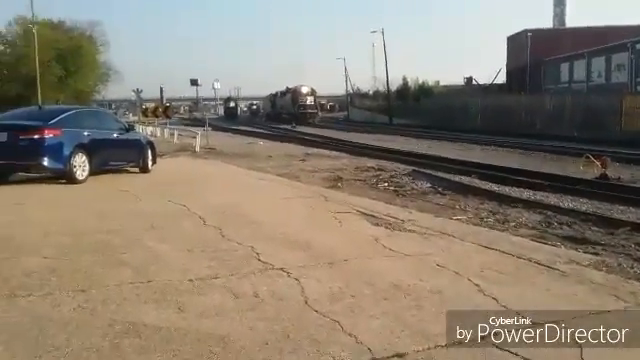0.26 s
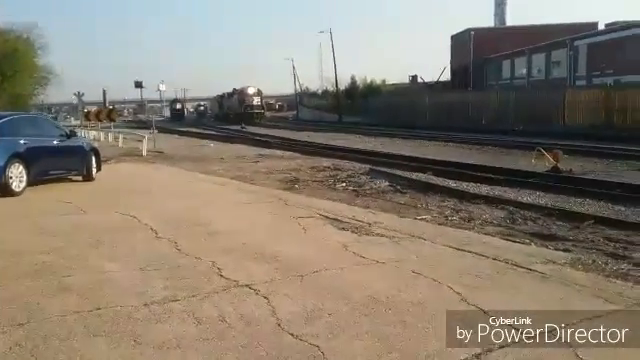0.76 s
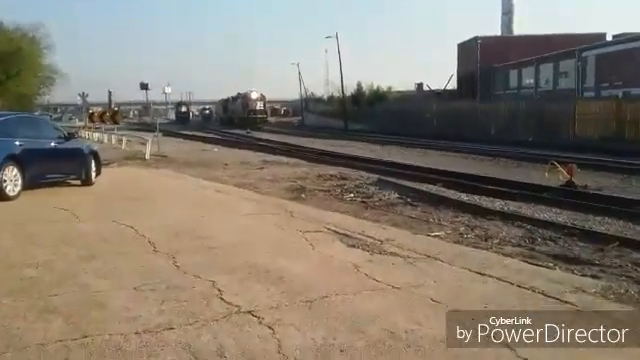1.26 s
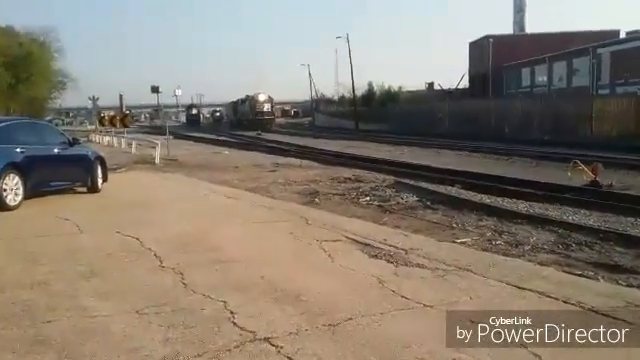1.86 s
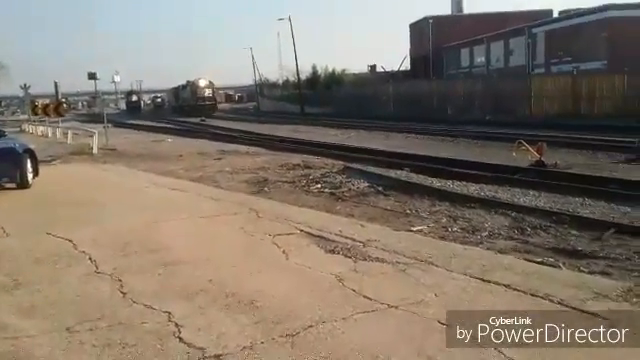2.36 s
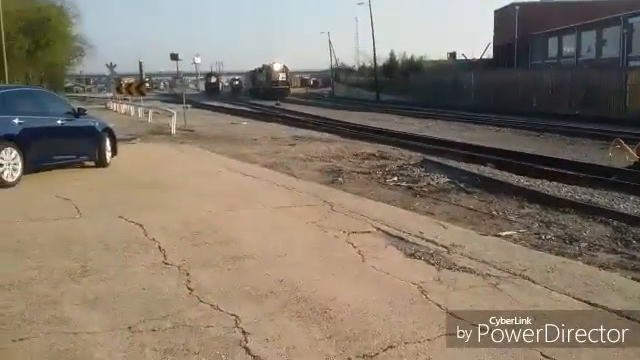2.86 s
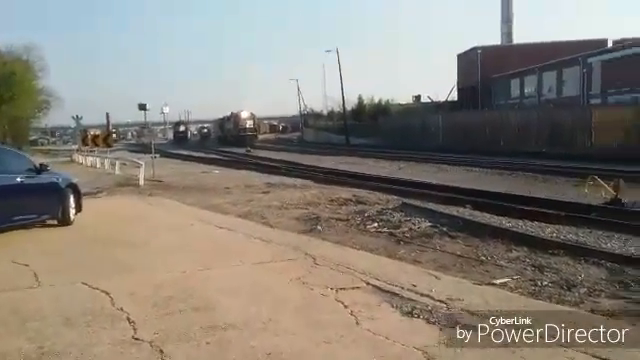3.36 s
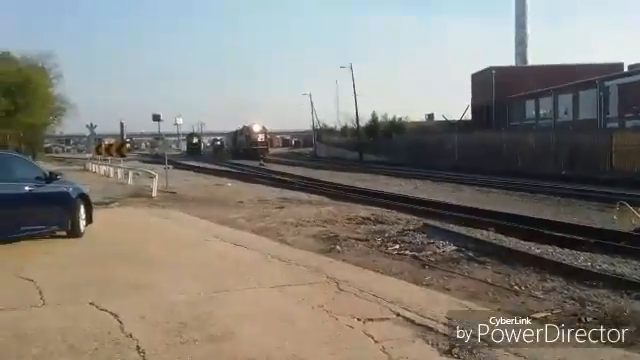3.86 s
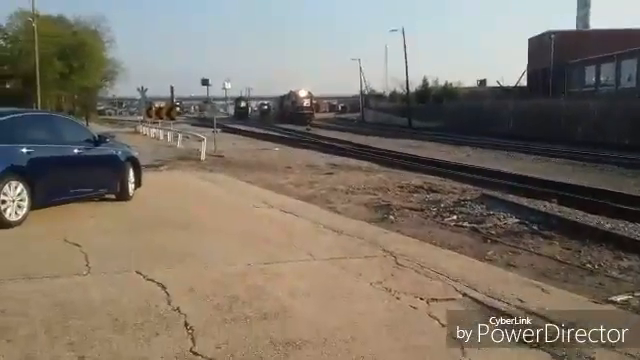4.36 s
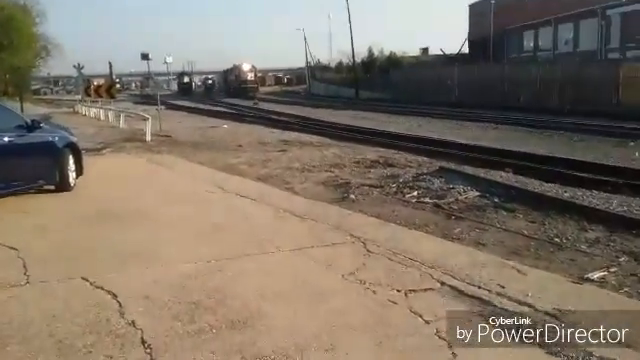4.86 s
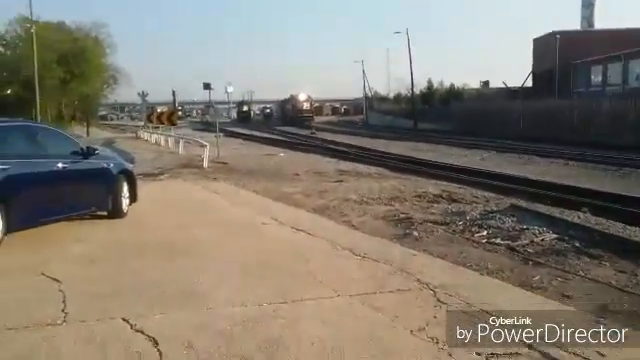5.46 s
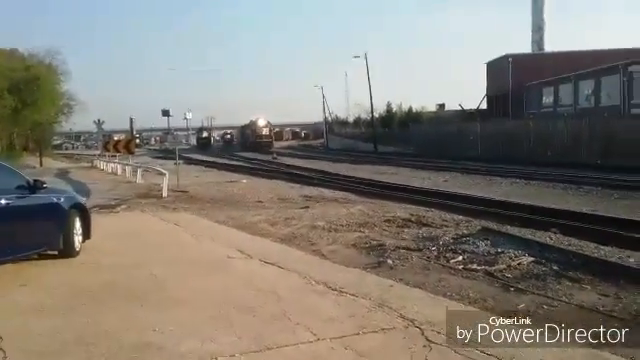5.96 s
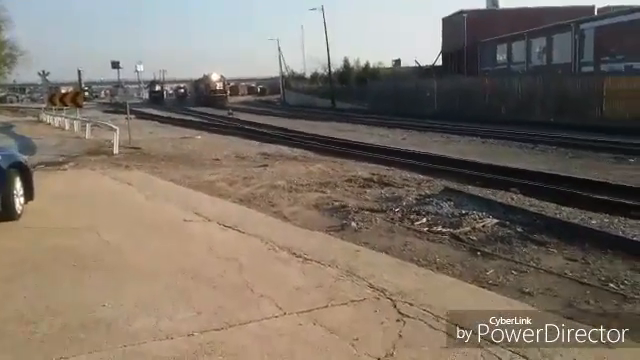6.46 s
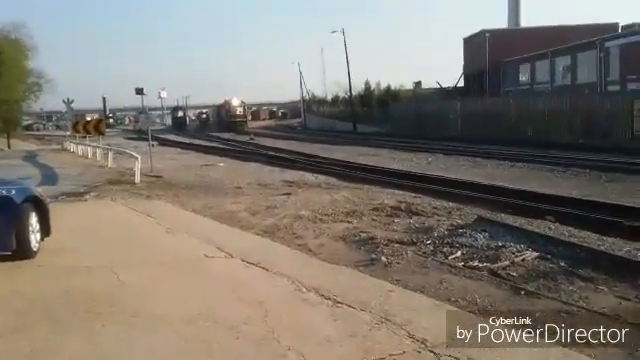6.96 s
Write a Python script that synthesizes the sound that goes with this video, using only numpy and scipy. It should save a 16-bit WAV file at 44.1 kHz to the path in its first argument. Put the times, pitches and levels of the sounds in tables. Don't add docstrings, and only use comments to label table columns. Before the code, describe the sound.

Two diesel locomotives idle across an open rail yard, their low throbbing drone slowly beating under faint whine and hiss while wind thumps the microphone.

```python
import sys
import numpy as np
from scipy import signal
from scipy.fft import rfft, irfft, next_fast_len
from scipy.io import wavfile

SR = 44100
rng = np.random.default_rng(int(sys.argv[2]) if len(sys.argv) > 2 else 0)


def dump_mix(stems):
    frames = np.atleast_2d(stems).T
    limited = np.clip(frames, -1, 1)
    pcm = np.round(limited * 32767).astype(np.int16)
    wavfile.write(sys.argv[1], SR, pcm)


def elevation(decibels):
    levels = np.asarray(decibels, float)
    return 10 ** (levels / 20)


N = 318402


def seconds():
    return np.arange(N) / SR


def curve(rows):
    s, db = np.transpose(rows)
    return np.interp(seconds(), s, db)


def swelling(rows):
    t = seconds()
    return sum(db * np.exp(-((t - s) / length) ** 2) for s, db, length in rows)


def rms_one(x):
    return x / np.sqrt(np.mean(x ** 2) + 1e-20)


def drift(rate):
    r = np.exp(-80 * np.pi * rate / SR)
    slow = signal.lfilter([1], [1, -2 * r, r * r], rng.standard_normal(N // 40 + 2002))[2000:]
    return np.interp(np.arange(N) / 40, np.arange(len(slow)), rms_one(slow - slow.mean()))


def resonance(x, hz, width):
    r = np.exp(-np.pi * width / SR)
    top_gain_one = np.array([1, 0, -1]) * (1 - r * r) / 2
    return signal.lfilter(top_gain_one, [1, -2 * r * np.cos(2 * np.pi * hz / SR), r * r], x)


def ringing_noise(hz, width):
    once = resonance(rng.standard_normal(N), hz, width)
    return rms_one(resonance(once, hz, width))


def noise(spectrum, shared_db, own_db, rate):
    size = next_fast_len(N)
    octave = np.log2(np.arange(1, size // 2 + 2) * SR / size)
    hz, db = np.transpose(spectrum)
    colour_db = np.interp(octave, np.log2(hz), db, left=-150, right=-150)
    colour = rfft(rng.standard_normal(size)) * elevation(colour_db)
    together_db = shared_db * drift(rate)
    out = 0
    for centre in np.arange(np.log2(hz[0]), np.log2(hz[-1]) + .5, .5):
        overlap = np.clip(1 - 2 * abs(octave - centre), 0, 1)
        band = irfft(colour * overlap, size)[:N]
        out = out + band * elevation(together_db + own_db * drift(rate))
    return rms_one(out)


def whine(hz, width, flicker_db=3.9):
    phase = 2 * np.pi * np.cumsum(hz + 0.608 * width * drift(width)) / SR
    return np.sqrt(2) * elevation(flicker_db * drift(34)) * np.sin(phase)


def tones(pitches_hz, shapes):
    return sum(elevation(db + 1.5 * drift(1.8)) * whine(hz, width)
               for hz, (width, db) in zip(pitches_hz, shapes))


def order_tone(turns, db):
    return np.sqrt(2) * elevation(db) * np.cos(2 * np.pi * turns)


# time in seconds, level in dB.
THROB = [(0, -27), (.55, -28), (.95, -20.5), (2.2, -24), (2.8, -21), (4.2, -23), (5, -28.5), (6.3, -20),
         (7.22, -22.5)]
# order of the engine cycle, near engine in dB, far engine in dB.
EXHAUST_ORDERS = [(7, -59, -43), (10, -34, -40), (11, -30, -30.5), (13, -41.5, -47), (14, -46, -44.5),
                  (15, -37.5, -40), (16, -41, -53.5), (18, -42.5, -44), (20, -32.5, -44.5),
                  (21, -36.5, -59.5), (22, -30, -41.5), (24, -31.5, -43), (26, -48.5, -51.5)]
NEAR_CYCLE_HZ, FAR_CYCLE_HZ = 8.393, 8.353
NEAR_THROB_S, FAR_THROB_S = .071, .0405
NEAR_DB, NEAR_SAG_S, NEAR_SAG_DB_PER_S = -20.2, 6.0, 3.5
FAR_DB, FAR_FADE_S, FAR_FADE_DB_PER_S = -20.6, 3.8, 9.5


def engines():
    t = seconds()
    near = NEAR_CYCLE_HZ * (t - NEAR_THROB_S)
    far = FAR_CYCLE_HZ * (t - FAR_THROB_S)
    near_sag_db = -NEAR_SAG_DB_PER_S * np.maximum(t - NEAR_SAG_S, 0)
    far_fade_db = -FAR_FADE_DB_PER_S * np.maximum(t - FAR_FADE_S, 0)
    out = order_tone(8 * near, NEAR_DB + near_sag_db)
    out += order_tone(8 * far, FAR_DB + far_fade_db)
    out += order_tone(9 * near, curve(THROB))
    for order, near_db, far_db in EXHAUST_ORDERS:
        for turns, db in ((near, near_db), (far, far_db + far_fade_db)):
            wander_db = 1.6 * drift(1.5)
            out += order_tone(round(order) * turns + .25 * rng.random(), db + wander_db)
    return out


# frequency in Hz, density in dB per Hz.
ROAR_COLOUR = [(18, -42.5), (30, -13), (82, -2), (125, -11), (194, -8.5), (360, -26), (595, -25.5),
               (667, -23.5), (749, -26.5), (1310, -30), (3000, -52), (3900, -84.5), (6600, -120)]


def roar(carry_db):
    sink_db = 0.25 * (seconds() - 4.5)
    level = elevation(-27.5 + 0.12 * carry_db - sink_db)
    return level * noise(ROAR_COLOUR, shared_db=1.3, own_db=1.06, rate=6.4)


# frequency in Hz, density in dB per Hz.
CLATTER_COLOUR = [(820, -7.5), (1400, -3), (2210, -3), (2360, -1), (2640, -7), (3850, -12), (4590, -13.5),
                  (6000, -16.5), (7800, -49.5), (13200, -120)]


def clatter(carry_db):
    return elevation(-41 + 0.88 * carry_db) * noise(CLATTER_COLOUR, shared_db=0.72, own_db=1.0, rate=3.8)


GEAR_HZ = [663.2, 948.8, 1326, 1338, 1519.5, 1989.6, 2368.6, 11633, 11768]
# width in Hz, level in dB.
GEAR_SHAPES = [(4.1, -48.5), (3.7, -57), (2.87, -49.5), (2.7, -56.5), (3.5, -71.5), (9, -56), (3.8, -54.5),
               (5, -92), (8, -92)]


def gears(carry_db):
    return elevation(1 + .3 * carry_db) * tones(GEAR_HZ, GEAR_SHAPES)


BLOWER_HZ = [4515, 4587, 4656, 4724]
# width in Hz, level in dB.
BLOWER_SHAPES = [(29, -10.5), (21.9, -5.5), (16, -3), (29.3, -5)]
# middle in seconds, rise in dB, length in seconds.
BLOWER_SWELLS = [
    (.62, 5, 0.31),
    (1.37, 4.5, 0.096),
    (2.76, 4, .08),
    (5.4, 5, 0.17),
    (6.15, 4, .15),
]


def blower(carry_db):
    level_db = -56.5 + 0.96 * carry_db + swelling(BLOWER_SWELLS) + 1.5 * drift(5.8)
    return elevation(level_db) * tones(BLOWER_HZ, BLOWER_SHAPES)


# frequency in Hz, density in dB per Hz.
HISS_COLOUR = [(2940, -45), (5000, -18), (6090, -10.5), (6580, -5), (6870, -2), (7120, 5.5), (7380, -12.5),
               (7700, -23), (8560, -29), (11100, -61), (18800, -120)]
# middle in seconds, rise in dB, length in seconds.
HISS_SWELLS = [(0.116, 0, .08), (.45, 3.5, 0.12), (1.175, 2.5, 0.054), (1.45, -1, .05), (2.633, 6.5, 0.13),
               (2.97, 4, .05), (4.868, 8, 0.047), (5.313, 0.5, 0.039), (5.553, 5.5, 0.062),
               (5.978, 2.5, .05)]


def hiss(carry_db):
    steady = noise(HISS_COLOUR, shared_db=.1, own_db=.6, rate=59)
    peak_db = swelling(HISS_SWELLS) + 2 * drift(40)
    port = resonance(steady, 7050, width=1800)
    return elevation(-42.5 + 0.96 * carry_db) * (steady + (elevation(peak_db) - 1) * port)


SQUEAL_HZ = [3343, 4116.5, 5630, 5900, 7700, 8209, 8282, 8700]
# width in Hz, level in dB, time to fall 60 dB in seconds.
SQUEAL_SHAPES = [(6, -47.5, .7), (5, -50.5, .9), (12, -56, .5), (12, -54, .5), (30, -64, .7), (8, -66, .9),
                 (8, -69, .8), (10, -74, .7)]


def squeal():
    t = seconds()
    past_hold = np.maximum(t - .2, 0)
    out = elevation(-58 - 60 * t / 1.4) * ringing_noise(10000, 5500)
    for hz, (width, db, t60) in zip(SQUEAL_HZ, SQUEAL_SHAPES):
        out += elevation(db + 1 - 60 * past_hold / t60) * whine(hz, width, flicker_db=.8)
    return out


# top in seconds, level in dB.
SPURTS = [
    (2.95, -37.5),
    (3.08, -39),
    (3.221, -30),
]
# frequency in Hz, density in dB per Hz.
PUFF_COLOUR = [(260, -45), (450, -9), (560, -5), (830, -6.5), (869, -8.5), (1480, -3), (2850, -18.5),
               (3180, -21), (4000, -27), (5200, -56), (8800, -120)]


def puff():
    t = seconds()
    level = 0
    for s, db in SPURTS:
        rise_db = 66.5 * np.maximum(s - t, 0)
        fall_db = 60 * np.maximum(t - s, 0)
        level = level + elevation(db - rise_db - fall_db)
    return level * noise(PUFF_COLOUR, shared_db=.3, own_db=.8, rate=19)


# time in seconds, level in dB.
GUST = [(0, -35), (.5, -36), (.8, -35.5), (1.07, -29), (1.4, -29.5), (1.7, -33.5), (1.95, -31.5),
        (2.3, -39), (2.9, -39), (3.5, -32), (3.9, -38.5), (4.2, -32.5), (4.5, -37.5), (4.9, -34),
        (5.4, -33.5), (5.7, -38), (6.8, -40), (7.22, -38)]
# middle in seconds, peak in dB, pitch in Hz.
EDDIES = [(.44, -9, 400), (.472, -13.5, 300), (.505, -6, 510), (.524, -9.5, 370), (0.803, -11, 288),
          (.975, -6, 514), (1.07, -5, 420), (1.24, -8, 400), (1.371, -9.5, 870), (1.401, -8.5, 820),
          (1.44, -6, 400), (1.5, -7.5, 268), (1.524, -11.5, 607), (1.621, -6.5, 372), (1.892, -5.5, 400),
          (1.975, -13.5, 590), (2.103, -12, 259), (2.544, -10.5, 320), (3.215, -11, 280),
          (3.48, -12.5, 400), (3.564, -10.5, 510), (3.658, -12, 370), (3.893, -11.5, 302),
          (4.204, -10.5, 510), (4.364, -11, 480), (4.743, -8.5, 417), (5.09, -9, 424), (5.648, -15.5, 480),
          (6.632, -16.5, 300), (7.17, -14.5, 370)]


def eddies():
    s, db, hz = np.repeat(EDDIES, 2, axis=0).T
    lag, dull = rng.random((len(s), 2)).T
    side = np.resize([-1, 1], len(s))
    follower_s = s + .025 * (.4 + .6 * lag) * side
    followers = np.transpose([follower_s, db - 6, hz * (0.57 + .35 * dull)])
    turn, size, pitch = rng.random((70, 3)).T
    gust_db = curve(GUST)
    passed = np.cumsum(elevation(gust_db))
    at = np.searchsorted(passed, (.01 + .98 * turn) * passed[-1])
    small_db = -19 + 3 * (2 * size - 1) + 0.24 * (gust_db[at] + 33.5)
    small = np.transpose([at / SR, small_db, 234 * (400 / 234) ** pitch])
    return np.vstack([EDDIES, followers, small])


def eddy_push(hz, lag, glide):
    t = np.arange(round((2.4 + 1.6 * glide) / hz * SR)) / SR
    share = t / t[-1]
    bell = np.sin(np.pi * share)
    push = bell ** 2 * np.cos(2 * np.pi * (hz * t * (1.05 - 0.27 * share) + lag))
    push += .5 * bell ** 2 * np.cos(2 * np.pi * (0.51 * hz * t + glide))
    push += elevation(-18) * bell ** 4 * np.cos(2 * np.pi * (2 * hz * t + lag + glide))
    return push


# frequency in Hz, density in dB per Hz.
WIND_COLOUR = [(30, -42), (60, -4), (100, -0.5), (200, -7), (300, -14), (450, -23.5), (700, -35),
               (1000, -58)]


def wind():
    rows = eddies()
    out = elevation(curve(GUST) + 12.0) * noise(WIND_COLOUR, shared_db=1.3, own_db=1.3, rate=14)
    for (s, db, hz), (lag, glide) in zip(rows, rng.random((len(rows), 2))):
        push = eddy_push(hz, lag, glide)
        level = elevation(db - 0.34 - 4.5 * np.log2(hz / 400))
        at = round(s * SR) - len(push) // 2
        out[at:at + len(push)] += (level * push)[:N - at]
    return out


# start in seconds, level in dB, pitch in Hz, width in Hz, length in seconds.
TICKS = [
    (1.098, -63, 8500, 6000, .009),
    (1.838, -64, 9800, 400, .007),
    (7.145, -68, 9800, 400, .007),
]


def ticks():
    t = seconds()
    return sum(elevation(db) * np.exp(-((t - s - length) / length) ** 2) * ringing_noise(hz, width)
               for s, db, hz, width, length in TICKS)


# frequency in Hz, density in dB per Hz.
FLOOR_COLOUR = [(7000, -7.5), (8500, -5.5), (9700, -3), (11000, -7.5), (13000, -7.5), (15400, -11),
                (16000, -13.5)]


def microphone_noise():
    return elevation(-72.5) * noise(FLOOR_COLOUR, shared_db=.1, own_db=.2, rate=5)


# time in seconds, level in dB.
CARRY = [(0, 8.5), (.3, 5.5), (.6, 6), (.9, 2), (1.3, 2.5), (1.9, -0.5), (2.5, 1), (2.9, -1), (3.3, -2),
         (3.8, -5), (4.6, -3.5), (4.9, -1.5), (5.4, 2), (5.9, 0), (6.3, -3), (6.9, -7), (7.22, -5.5)]


def scene():
    carry_db = curve(CARRY)
    out = engines() + roar(carry_db) + clatter(carry_db)
    out += gears(carry_db) + blower(carry_db) + hiss(carry_db)
    out += squeal() + puff() + wind() + ticks()
    return out[None]


def roll_off(x):
    return signal.sosfilt(signal.butter(12, 15500, fs=SR, output="sos"), x)


def record(dry):
    x = signal.sosfilt(signal.butter(3, 45, "high", fs=SR, output="sos"), dry)
    x = .95 * np.tanh(x / .95) + microphone_noise()
    return roll_off(x)


dry = scene()
out = record(dry)
dump_mix(out)
```